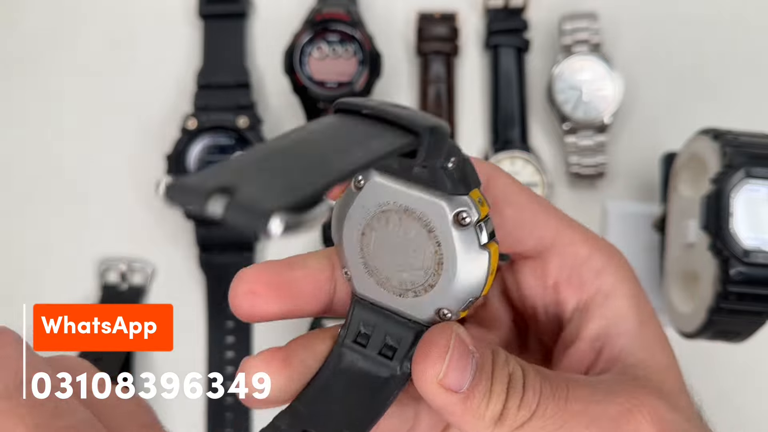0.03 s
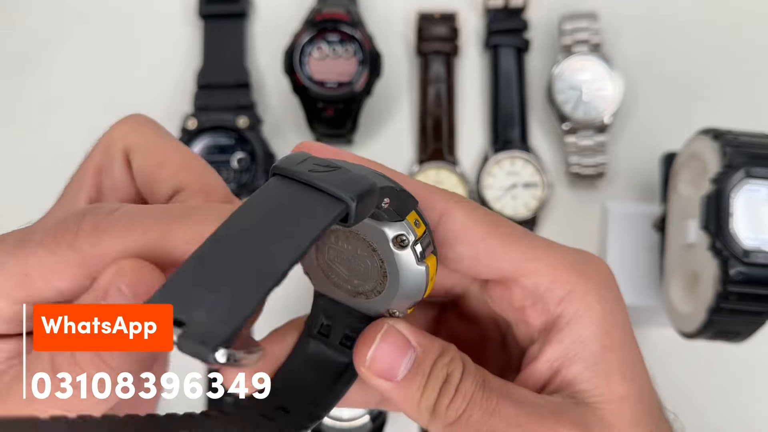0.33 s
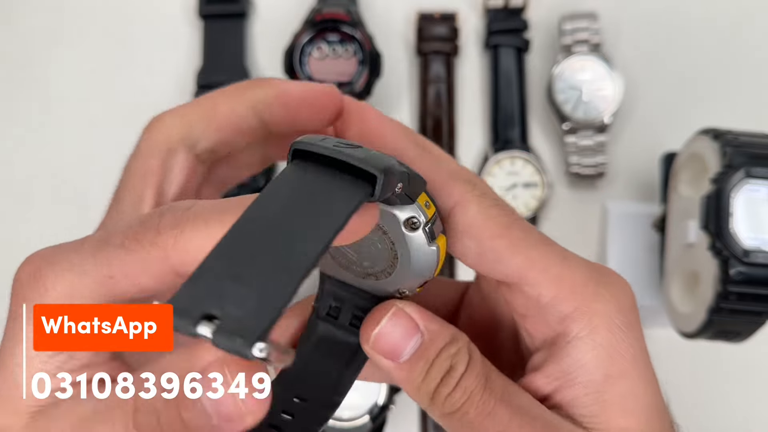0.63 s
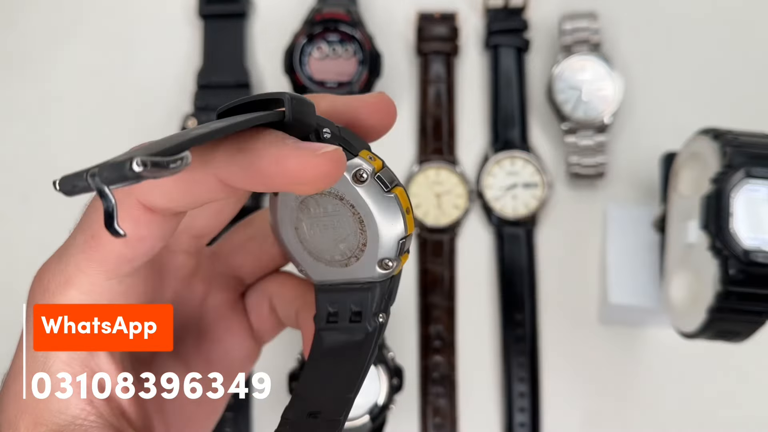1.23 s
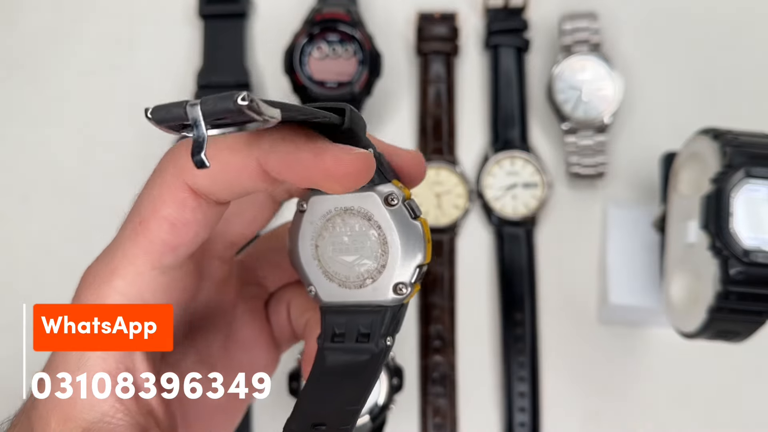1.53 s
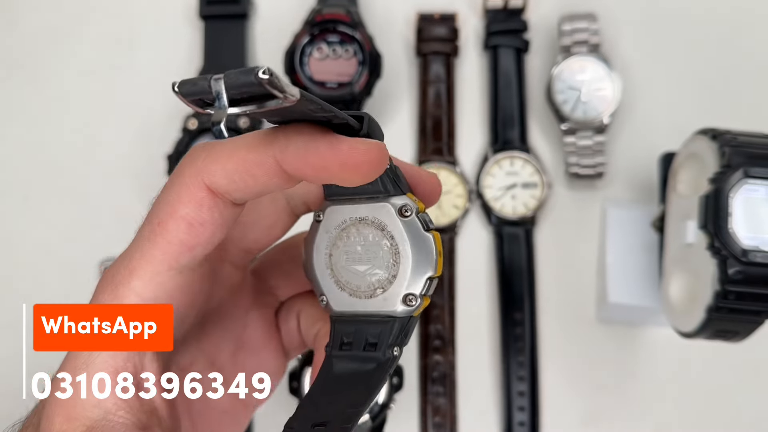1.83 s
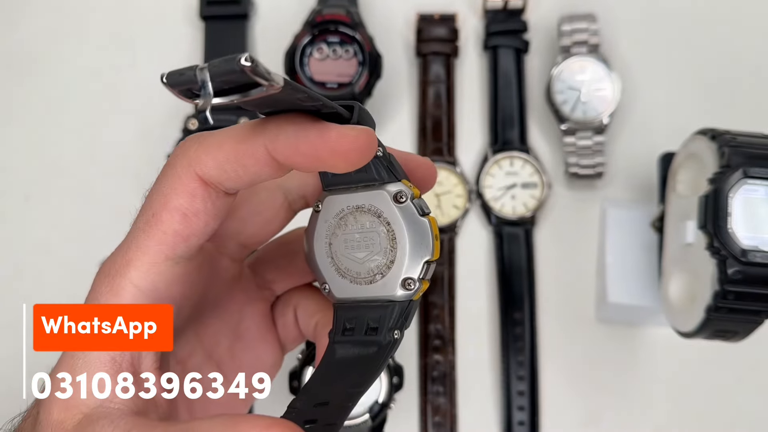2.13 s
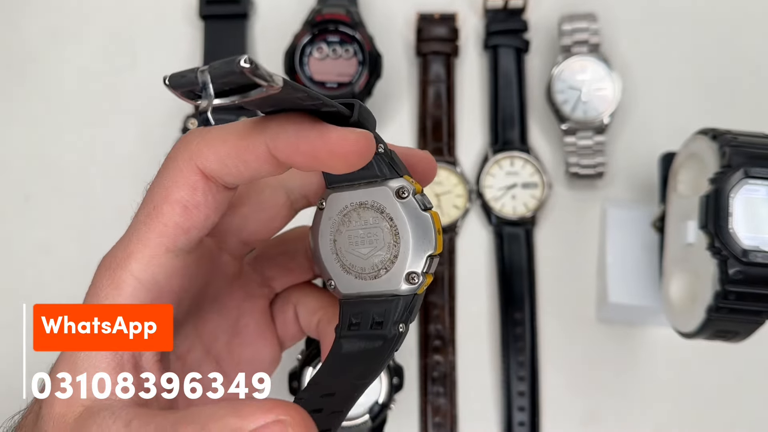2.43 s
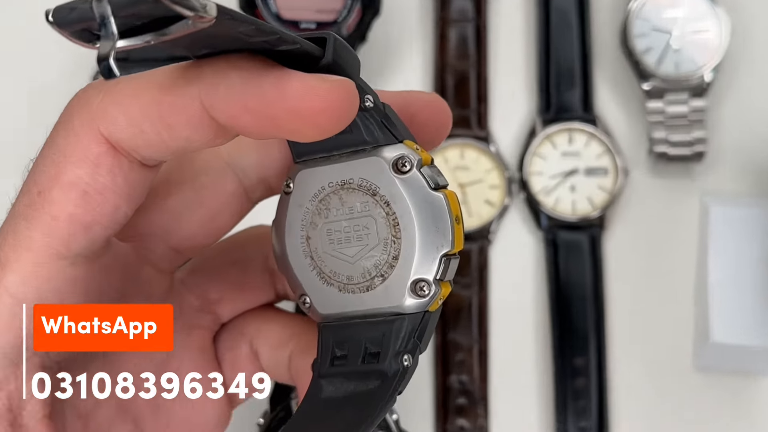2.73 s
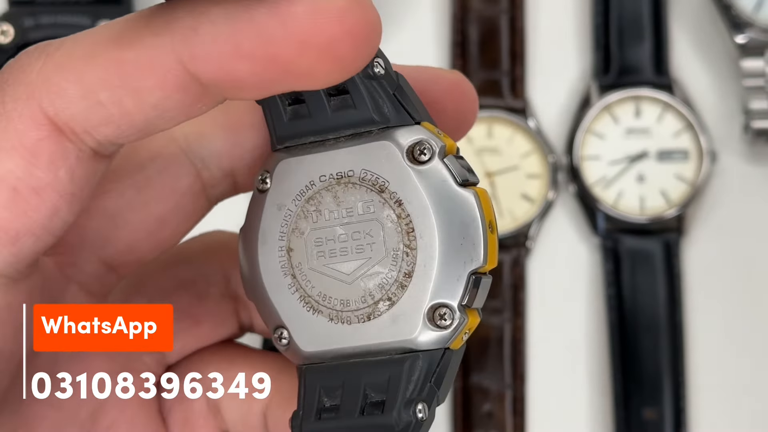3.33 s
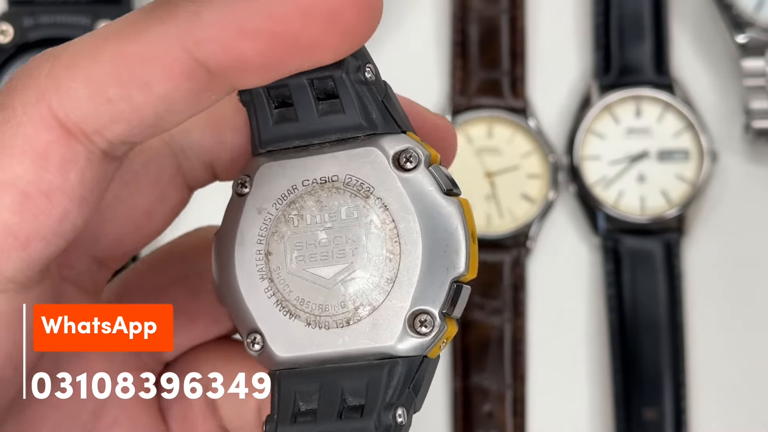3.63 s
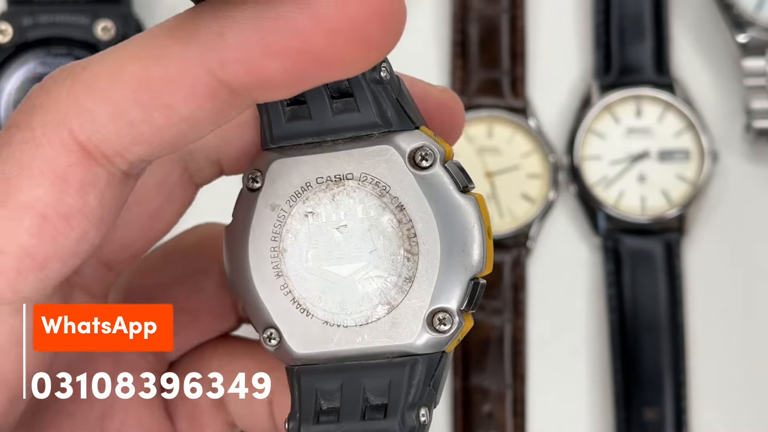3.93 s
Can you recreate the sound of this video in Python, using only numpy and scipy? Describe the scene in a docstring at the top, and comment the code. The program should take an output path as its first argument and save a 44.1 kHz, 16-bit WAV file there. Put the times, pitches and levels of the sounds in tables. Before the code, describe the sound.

A steel watch buckle gives one sharp clack and a tiny tinkle. The rubber strap slides faintly over skin and fingers tick and rub on the case, close up in a small room with a low rumble.

```python
"""A faint brush of rubber, then one sharp steel clack: a wristwatch turned over in the hands, close up.
The buckle rings from the hit and its loose tongue tinkles against the frame. The strap slides over
skin with a tiny squeak, the hinge grates, and fingers tick, rub and bump on the case.
A microphone pair above a table hears it all in a small room, over a low, wavering rumble and faint hiss."""
import sys
import numpy as np
from scipy import signal
from scipy.fft import rfft, irfft, next_fast_len
from scipy.io import wavfile
from scipy.ndimage import uniform_filter1d, map_coordinates

SR = 44100
rng = np.random.default_rng(int(sys.argv[2]) if len(sys.argv) > 2 else 0)


def master_out(mix):
    """Clip the mix to full scale and print it as 16-bit PCM to the path in sys.argv[1]."""
    frames = np.transpose(np.atleast_2d(mix))
    ceiling = np.clip(frames, -1, 1)
    pcm = np.round(ceiling * 32767).astype(np.int16)
    wavfile.write(sys.argv[1], SR, pcm)


N = 176400

# The buckle hitting its frame, three hits heard as one clack.
# Each row: start in seconds, level in dB, brightness in dB per octave, ring level in dB.
BUCKLE_HITS = [(.1536, -46, 2, -14), (.1720, -24, 0, 0), (.1741, -35, .8, -18)]
# The buckle's steel ring. Each row: frequency in Hz, level in dB, 60 dB decay time in seconds.
BUCKLE_MODES = [(400, -27, .03), (510, -22, .025), (1280, -14, .023), (1560, -19, .014), (2080, -26, .02),
                (2527, -12, .029), (2790, -18, .016), (3865, -17, .025), (4250, -18, .02),
                (4450, -11, .018), (5960, -21, .02), (7005, -18.5, .032), (7400, -17.5, .035),
                (7950, -10, .034), (8490, -12.5, .017), (8980, -18, .017), (12450, -21, .011),
                (15500, -21, .013)]
# The crack at the front of each hit. Each row: frequency in Hz, level in dB.
CRACK_EQ = [(150, -13), (350, -2), (520, 3), (800, -8), (1350, 1), (1900, -5), (2600, 1), (3300, -6),
            (4400, 2), (5100, 1), (6100, 1), (6600, -5), (8000, 3), (9500, 0), (10900, -11), (12500, -3),
            (14300, 0), (16000, -9)]
# The tongue touching the frame. Each row: start in seconds, level in dB, low-mode level in dB.
TONGUE_HITS = [(.0993, -48, -9), (.1862, -40.5, -9), (.209, -49, -14), (.2764, -43.5, -2), (.3582, -54, -1)]
# The tongue's tight top cluster. Each row: frequency in Hz, level in dB, 60 dB decay time in seconds.
TONGUE_HIGH_MODES = [(14110, 0, .043), (14085, -17, .11), (14205, -9, .03)]
# The tongue's lower ring. Each row: frequency in Hz, level in dB, 60 dB decay time in seconds.
TONGUE_LOW_MODES = [(6280, -19, .05), (6520, -21, .04), (7800, -22, .025)]
# The click at the front of each tinkle. Each row: frequency in Hz, level in dB.
TONGUE_CLICK_EQ = [(1000, -30), (5000, -18), (8000, -10), (11000, -12), (14500, 0), (16000, -3)]
# Strap and case ticking under the fingers. Each row: start in seconds, level in dB, brightness in
# dB per octave, 60 dB decay time in seconds, low-pass cutoff in Hz, resonance in Hz.
TICK_HITS = [(.038, -56, -1.5, .02, 3500, 2200), (.1486, -43.5, -.5, .013, 9000, 1900),
             (.527, -63.5, -.5, .03, 3200, 2500), (.5545, -63, 4.5, .01, 14000, 7700),
             (.9665, -64, -2.5, .02, 5500, 1300), (1.1845, -53, -1.5, .014, 6500, 4700),
             (1.446, -67.5, -2.3, .016, 6000, 4500), (1.6345, -54.5, -.8, .015, 14000, 1150),
             (1.712, -65, -2.5, .014, 6000, 1100), (1.789, -67, -2, .015, 6200, 4800)]
# The tone all ticks share. Each row: frequency in Hz, level in dB.
TICK_EQ = [(200, -15), (700, -3), (1100, 0), (1600, -4), (2300, 0), (3300, -6), (5000, -2), (8000, -6),
           (11000, -20), (15000, -17)]
# The strap sliding over skin. Each row: peak time in seconds, level in dB, 20 dB rise and fall in seconds.
SLIDE_STROKES = [(.075, -65.5, .04, .05), (.63, -81, .05, .06), (.74, -81, .08, .08),
                 (.858, -61.5, .075, .03), (.884, -60.5, .025, .02), (1.48, -84, .08, .1)]
# The slide's bright swish. Each row: frequency in Hz, level in dB.
SLIDE_EQ = [(300, -15), (1100, -4), (2200, -5), (3600, -13), (4800, -8), (5600, -2), (6400, 0), (7000, -2),
            (7600, 7), (8200, 0), (9000, -3), (11500, -13), (13300, -9), (14000, 2), (15500, -1),
            (16000, -16)]
# The pin grating in its hinge.
# Each row: peak time in seconds, level in dB, 20 dB rise and fall in seconds.
GRATE_STROKES = [(.528, -65, .008, .014), (.554, -72, .014, .012), (1.2, -76, .08, .16),
                 (1.372, -75, .025, .04)]
# The hinge's thin rasp. Each row: frequency in Hz, level in dB.
GRATE_EQ = [(3000, -40), (5800, -16), (6350, -1), (6750, -4), (7100, -10), (7600, 3), (7950, -4),
            (8500, -17), (10000, -32), (14000, -22), (16000, -40)]
# Fingers rubbing the case. Each row: peak time in seconds, level in dB, 20 dB rise and fall in seconds.
RUB_STROKES = [(.05, -76, .1, .08), (.87, -73, .04, .04), (.97, -80, .06, .12), (1.2, -67.5, .12, .25),
               (1.45, -79, .12, .22), (1.65, -77, .03, .08)]
# The rub's broad rustle. Each row: frequency in Hz, level in dB.
RUB_EQ = [(150, 0), (450, 3), (800, 0), (1100, 1), (2300, 2), (3300, -2), (4500, -1), (6500, -5),
          (8000, -6), (10500, -21), (14500, -17), (16000, -32)]
# Bumps of the hands. Each row: peak time in seconds, level in dB, 20 dB rise and fall in seconds.
BUMP_STROKES = [(1.17, -51, .3, .22), (1.81, -49, .04, .05)]
# The bumps' soft low end. Each row: frequency in Hz, level in dB.
BUMP_EQ = [(20, -25), (45, -6), (90, 0), (130, -6), (200, -23), (500, -52), (1500, -95)]
# The watch's stereo position. Each row: frequency in Hz, lag of left behind right in radians.
LEFT_LAG = [(1800, 0), (2500, -.35), (3900, -.7), (4450, -1), (5100, .6), (7000, .9), (8000, 1.5),
            (10000, 2.4), (14200, 3.9), (16000, 5)]
# The diffuse wash behind the clack. Each row: frequency in Hz, level in dB.
WASH_EQ = [(200, 1), (450, 4), (1000, 1.5), (1700, -1.5), (2500, 0), (3300, -3), (4400, -1), (6000, -2),
           (6600, -4), (7400, 5), (8400, 3), (9300, -9), (11000, -18), (16000, -17)]
# The room's tail. Each row: frequency in Hz, 60 dB decay time in seconds.
ROOM_DECAY = [(200, .22), (1000, .2), (4000, .22), (8000, .24), (11000, .09), (14000, .15), (16000, .08)]
# The drone's swells and dips. Each row: time in seconds, level in dB before the trim.
DRONE_LEVELS = [(0.0, -54), (0.37, -54), (0.44, -46), (0.76, -61), (1.19, -49), (1.3, -67), (1.44, -46),
                (1.77, -57), (1.79, -48), (1.93, -56), (2.32, -45), (2.6, -58), (3.27, -45), (3.51, -59),
                (3.77, -49), (3.83, -69), (3.88, -56), (4.0, -71)]
# The room's rumble. Each row: frequency in Hz, level in dB ahead of its low-pass.
RUMBLE_EQ = [(18, -29), (30, -12), (39, -12), (50, -3), (66, -2), (95, 0), (130, -7), (150, -12),
             (170, -11), (200, -20), (260, -26), (400, -34), (700, -48), (1400, -90)]
# The faint hiss. Each row: frequency in Hz, level in dB.
HISS_EQ = [(250, -1), (450, 5), (750, 2), (1400, -2), (1900, 0), (2100, -1), (2450, 3.5), (3200, -6),
           (4300, -10.5), (6200, -9), (8000, -13), (10500, -23), (13000, -25), (15000, -33)]
# The stereo width of rumble and hiss. Each row: frequency in Hz, left-right correlation from -1 to 1.
BED_CORRELATION = [(100, .998), (200, .9), (400, .5), (700, 0), (1150, 0), (1500, .75), (2000, .98),
                   (7000, .98), (9000, .3), (11000, -.8)]

CONTACT_T60_S, PRE_ROLL_S = .0105, .02  # the pre-roll leaves space ahead of each attack


def buckle_clack(crack_db=-1.5):
    """Steel hits steel: a broadband crack, then the short ring of the frame."""
    out = np.zeros(N)
    t = np.arange(SR // 4) / SR - PRE_ROLL_S
    for start, db, tilt_db, ring_db in BUCKLE_HITS:
        crack = amp(crack_db) * burst(CRACK_EQ, t, CONTACT_T60_S, tilt_db)
        frame = amp(ring_db) * ring(BUCKLE_MODES, t)
        add(out, start - PRE_ROLL_S, amp(db) * (crack + frame))
    return out


def tongue_tinkle(click_db=-7, flutter_db=3.2):
    """The loose tongue taps the frame; its top ring flutters as it shakes in the hinge."""
    out = np.zeros(N)
    t = np.arange(SR // 4) / SR - PRE_ROLL_S
    for start, db, low_db in TONGUE_HITS:
        click = amp(click_db) * burst(TONGUE_CLICK_EQ, t, CONTACT_T60_S)
        flutter = amp(flutter_db * wobble(200)[:len(t)])
        high_ring = flutter * ring(TONGUE_HIGH_MODES, t)
        low_ring = amp(low_db) * ring(TONGUE_LOW_MODES, t)
        add(out, start - PRE_ROLL_S, amp(db) * (click + high_ring + low_ring))
    return out


def finger_ticks(boost_db=5, width_octaves=.15):
    """Dry ticks of rubber and plastic; each spot has its own softness and hollow note."""
    out = np.zeros(N)
    t = np.arange(SR // 8) / SR - PRE_ROLL_S
    for start, db, tilt_db, t60, cutoff_hz, resonance_hz in TICK_HITS:
        def spot(hz):
            bell = np.exp(-(np.log2((hz + 1) / resonance_hz) / width_octaves) ** 2)
            return amp(boost_db * bell) / np.sqrt(1 + (hz / cutoff_hz) ** 8)
        add(out, start - PRE_ROLL_S, amp(db) * filtered(burst(TICK_EQ, t, t60, tilt_db), spot))
    return out


def strap_slide():
    """Rubber drags over skin in a fine-grained swish."""
    return friction(SLIDE_STROKES, SLIDE_EQ, grain_db=2.5, grain_rate=420)


def strap_zip(peak_s=.865, peak_db=-76.5, centre_hz=6000, octaves_per_s=1.4, width_hz=1500):
    """A soft band of friction noise glides upward along the long slide."""
    t = np.arange(N) / SR - peak_s
    hz = np.minimum(centre_hz * 2 ** (octaves_per_s * t), 16200)
    slips = wobble(width_hz) + 1j * wobble(width_hz)
    band = np.real(slips * np.exp(2j * np.pi * np.cumsum(hz) / SR))
    return swell(peak_s, peak_db, rise_s=.2, fall_s=.04) * unit(band)


def strap_squeak(peak_s=.69, peak_db=-82, spread_s=.05, pitch_hz=985, waver_hz=32):
    """The rubber sticks and slips at an unsteady pitch."""
    t = np.arange(N) / SR - peak_s
    hz = pitch_hz + waver_hz * wobble(200)
    envelope = amp(peak_db) * np.exp(-(t / spread_s) ** 2 / 2)
    return envelope * np.sin(2 * np.pi * np.cumsum(hz) / SR)


def finger_rub():
    """Fingers shift on the case with a soft, grainy rustle."""
    return friction(RUB_STROKES, RUB_EQ, grain_db=2.8, grain_rate=250)


def hinge_grate():
    """The buckle's pin scrapes in its hinge, thin and gritty."""
    return friction(GRATE_STROKES, GRATE_EQ, grain_db=3, grain_rate=200)


def hand_bumps():
    """The shifting hands add soft swells of bass."""
    return friction(BUMP_STROKES, BUMP_EQ, grain_db=1, grain_rate=20)


def clack_wash(send_db=-28.5, t60=.235, rise_s=.004):
    """The clack scatters off table and walls into an even, toneless tail."""
    power = np.zeros(N)
    for start, db, _, _ in BUCKLE_HITS:
        age = np.maximum(np.arange(N) / SR - start, 0)
        power += (amp(db - 60 * age / t60) * (1 - np.exp(-age / rise_s))) ** 2
    focused = microphone_pair(noise(WASH_EQ, N))
    wide = noise(WASH_EQ, (2, N))
    return amp(send_db) * np.sqrt(power / 2) * (focused + wide)


def room_reverb(x, early_db=-14, early_t60=.045, tail_db=-14):
    """Quick reflections off table and hands, then the short tail of the room."""
    hz, frame_s, bands = signal.stft(rng.standard_normal((2, SR // 2)), SR, nperseg=256)
    decay = amp(-60 * frame_s / along(ROOM_DECAY, hz)[:, None])
    tail = signal.istft(bands * decay, SR, nperseg=256)[1]
    t = np.arange(tail.shape[1]) / SR
    early = rng.standard_normal(tail.shape) * amp(-60 * t / early_t60) * (t > .001)
    tail *= amp(tail_db) / np.linalg.norm(tail[0])
    early *= amp(early_db) / np.linalg.norm(early[0])
    return signal.fftconvolve(x[None], early + tail, axes=1)[:, :N]


def low_drone(pitch_hz=65.3, waver_hz=1.5, trim_db=-1):
    """A low tone wavers in pitch as it swells and dips."""
    level_db = np.interp(np.arange(N) / SR, *np.transpose(DRONE_LEVELS))
    hz = pitch_hz + waver_hz * wobble(10)
    return amp(level_db + trim_db) * unit(np.sin(2 * np.pi * np.cumsum(hz) / SR))


def room_tone(rumble_db=-55.5, hiss_db=-78.2, cutoff_hz=520):
    """A bed of rumble and faint hiss, centred in the bass and varying in width above it."""
    def layer():
        rumble = filtered(noise(RUMBLE_EQ, N), lambda hz: 1 / (1 + (hz / cutoff_hz) ** 6))
        return amp(rumble_db) * unit(rumble) + amp(hiss_db) * noise(HISS_EQ, N)

    def width(hz):
        angle = np.arccos(along(BED_CORRELATION, hz)) / 2
        return np.array([np.cos(angle), np.sin(angle)])

    mid, side = filtered(np.array([layer(), layer()]), width)
    return np.array([mid + side, mid - side])


def burst(eq, t, t60, tilt_db=0, smooth_hz=500):
    """A contact at t = 0: dying noise, flattened in spectrum, then coloured by the struck part."""
    envelope = amp(-60 * np.abs(t) / t60) * (t >= 0)
    spectrum = rfft(rng.standard_normal(len(t)) * envelope)
    hz = np.fft.rfftfreq(len(t), 1 / SR)
    local_power = np.abs(uniform_filter1d(np.abs(spectrum) ** 2, round(smooth_hz / hz[1])))
    coloured = spectrum / np.sqrt(local_power) * eq_gain(eq, hz, tilt_db)
    return unit(irfft(coloured, len(t))) * np.sqrt(np.mean(envelope ** 2))


def ring(modes, t, attack_s=.00015):
    """Damped modes struck at t = 0, balanced a little differently at each hit."""
    age = np.maximum(t, 0)
    out = np.zeros(len(t))
    for k, (hz, db, t60) in enumerate(modes):
        polarity = (-1) ** (k // 2)
        envelope = amp(db + rng.normal(0, 1) - 60 * age / t60)
        out += polarity * envelope * np.sin(2 * np.pi * hz * age)
    return out * (1 - np.exp(-age / attack_s))


def friction(strokes, eq, grain_db, grain_rate):
    """Strokes of noise that swell and fade, roughened by many tiny slips."""
    power = sum(swell(*stroke) ** 2 for stroke in strokes)
    texture = noise(eq, N) * amp(grain_db * wobble(grain_rate))
    return np.sqrt(power) * unit(texture)


def swell(peak_s, peak_db, rise_s, fall_s):
    """An envelope that climbs 20 dB per rise_s and drops 20 dB per fall_s."""
    t = np.arange(N) / SR - peak_s
    return amp(peak_db - 20 * np.maximum(-t / rise_s, t / fall_s))


def microphone_pair(x):
    """The watch is close, and its upper treble reaches the right microphone first."""
    return filtered(x, lambda hz: np.exp(.5j * along(LEFT_LAG, hz) * np.array([[-1], [1]])))


def noise(eq, size):
    """Coloured noise of rms 1."""
    return unit(filtered(rng.standard_normal(size), lambda hz: eq_gain(eq, hz)))


def eq_gain(eq, hz, tilt_db=0):
    """The gain of an EQ curve, tilted by tilt_db per octave."""
    return amp(along(eq, hz) + tilt_db * np.log2(hz + 1))


def filtered(x, response):
    """x through a frequency response."""
    n = x.shape[-1]
    padded = next_fast_len(n + 8192)
    return irfft(rfft(x, padded) * response(np.fft.rfftfreq(padded, 1 / SR)), padded)[..., :n]


def along(points, hz):
    """A curve through (Hz, value) points on a log frequency axis."""
    knots_hz, values = np.transpose(points)
    return np.interp(np.log(hz + 1), np.log(knots_hz + 1), values)


def wobble(rate):
    """Smooth random modulation, rate knots a second."""
    knots = rng.standard_normal(int(N * rate / SR) + 4)
    return map_coordinates(knots, [np.arange(N) * rate / SR])


def amp(db):
    """Decibels to gain."""
    return 10 ** (np.asarray(db) / 20)


def unit(x):
    """x scaled to rms 1."""
    return x / np.sqrt(np.mean(x ** 2) + 1e-20)


def add(track, start_s, sound):
    """Mix a sound into the track at start_s."""
    part = track[round(start_s * SR):][:len(sound)]
    part += sound[:len(part)]


def scene(steel_send_db=-7):
    """Steel and rubber up front, their reflections behind, and the quiet room underneath."""
    steel = buckle_clack() + tongue_tinkle()
    strap = strap_slide() + strap_zip() + strap_squeak()
    handling = strap + finger_ticks() + finger_rub() + hinge_grate()
    reflections = room_reverb(handling + amp(steel_send_db) * steel) + clack_wash()
    return microphone_pair(steel + handling) + reflections + hand_bumps() + low_drone() + room_tone()


def record(dry):
    """A steep low-pass takes off the very top."""
    cutoff_hz, edge_hz = 16200, 70
    return filtered(dry, lambda hz: .5 - .5 * np.tanh((hz - cutoff_hz) / edge_hz / 2))


dry = scene()
out = record(dry)
master_out(out)
```